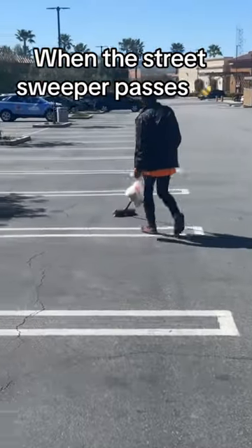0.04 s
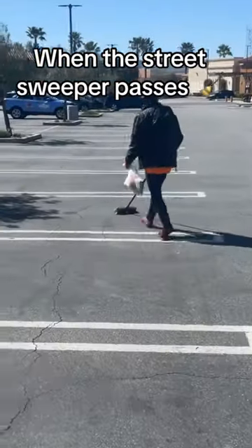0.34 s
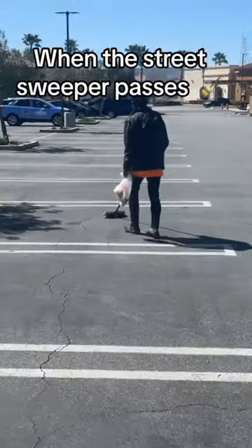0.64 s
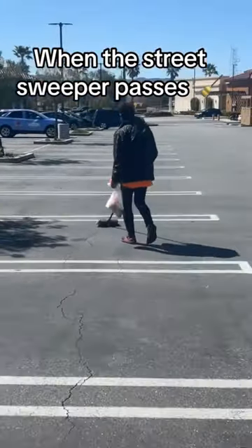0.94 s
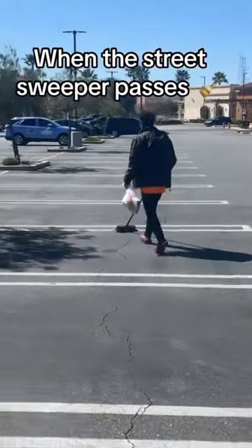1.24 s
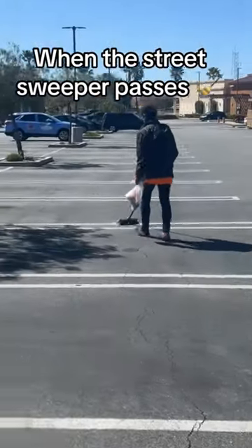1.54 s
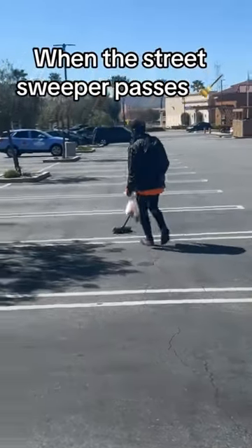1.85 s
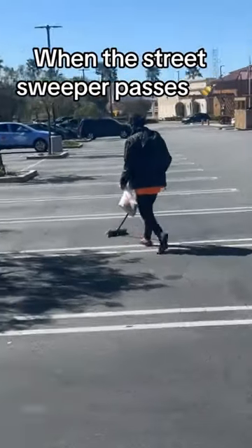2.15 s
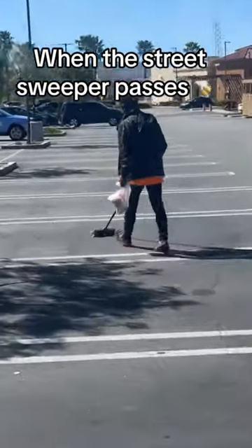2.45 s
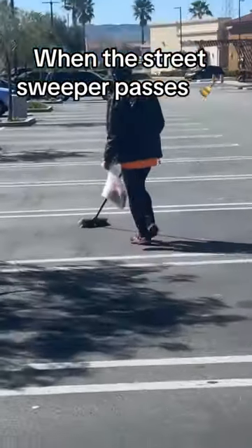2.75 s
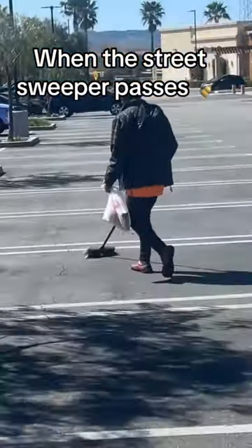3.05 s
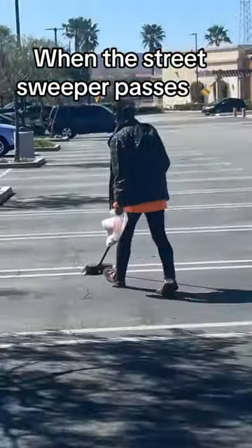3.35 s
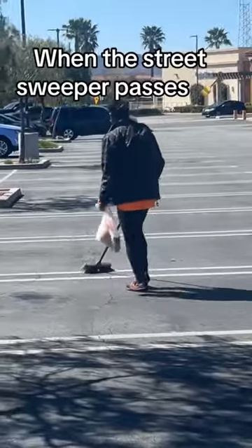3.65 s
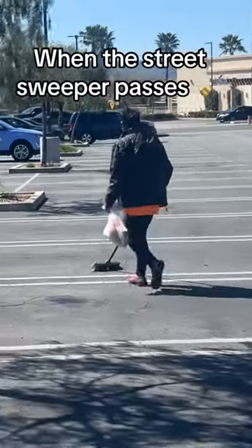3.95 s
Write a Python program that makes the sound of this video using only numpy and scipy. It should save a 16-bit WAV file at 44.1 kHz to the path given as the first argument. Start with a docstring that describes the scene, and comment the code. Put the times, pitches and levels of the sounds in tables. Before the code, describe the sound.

A stiff broom rasps over asphalt in repeated strokes, with faint footsteps between.

```python
"""A stiff broom is pushed over rough asphalt in an open car park, one stroke every two paces.
A stroke ends as the scene opens, over far traffic and a little wind on the microphone.
Shoes then tap, scuff, crack grit and roll softly over the ground. With the next push, thousands
of bristle flicks merge into a bright rasp that swells with speed and dies as the head lifts.
Steps and strokes go on alternating, with a faint return from cars and shop fronts."""
import sys
import numpy as np
from scipy import signal
from scipy.fft import rfft, irfft
from scipy.io import wavfile

SR = 44100
rng = np.random.default_rng(int(sys.argv[2]) if len(sys.argv) > 2 else 0)


def generate_wav(sig):
    """Save sig (samples, or channels by samples) to the path in sys.argv[1] as 16-bit PCM at SR."""
    pcm = np.round(np.clip(np.atleast_2d(sig).T, -1, 1) * 32767).astype(np.int16)
    wavfile.write(sys.argv[1], SR, pcm)


N = 176400
T = np.arange(N) / SR


def amp(db):
    """The decibel scale: 20 dB is a factor of ten in amplitude."""
    return 10 ** (np.asarray(db) / 20)


def unit(x):
    """Normalisation to an rms of 1."""
    return x / np.sqrt(np.mean(x ** 2) + 1e-20)


def colour(x, points):
    """Linear filtering by (Hz, dB) points, joined on a logarithmic frequency axis."""
    point_hz, db = np.transpose(points)
    hz = np.fft.rfftfreq(len(x), 1 / SR)
    gain = amp(np.interp(np.log(hz + 1), np.log(point_hz + 1), db))
    return irfft(rfft(x) * gain, len(x))


def resonate(x, hz, width_hz):
    """Forced response of one damped mode, scaled to rms 1."""
    pole = np.exp((2j * np.pi * hz - np.pi * width_hz) / SR)
    return unit(signal.lfilter([1], [1, -pole], x).real)


def clicks(per_s, spread_db):
    """Shot noise: independent impulses of uneven size and random sign."""
    size = amp(spread_db * np.minimum(rng.exponential(1, N), 5))
    return unit(size * rng.choice([-1, 1], N) * (rng.random(N) < per_s / SR))


def wobble(hz):
    """Random modulation: noise low-passed at the given frequency, at rms 1."""
    rolloff = 1 + (np.fft.rfftfreq(N, 1 / SR) / hz) ** 4
    return unit(irfft(rfft(rng.standard_normal(N)) / rolloff, N))


def burst(start, decay_s):
    """The envelope of a damped impact: sudden onset, exponential decay."""
    return (T >= start) * np.exp(-np.maximum(T - start, 0) / decay_s)


def near_echoes(x, count=14):
    """Comb filtering: reflections off ground, legs and broom head give a slightly hollow colour."""
    delays_s = rng.uniform(0.0007, 0.008, count)
    signs = rng.choice([-1, 1], count)
    echoes = sum(sign * np.roll(x, round(s * SR)) for s, sign in zip(delays_s, signs))
    return unit(x + amp(-9.5) / np.sqrt(count) * echoes)


def broom():
    """Stick-slip friction: bristles catch and flick, shaking the head and exciting the broom's modes."""
    # Each row: times of touch, full speed and lift in seconds, then level, softening at the touch,
    # head offset and tip offset, all in dB.
    strokes = [(-.3, -0.013, 0.024, -27, 20, 0.5, 4), (0.574, 0.725, .803, -26, 17.5, 0.5, 4),
               (1.296, 1.52, 1.5214, -25.5, 19, 0.5, 2.5), (2.046, 2.242, 2.297, -26.5, 17, 0.5, 0.5),
               (2.786, 3.013, 3.0353, -25, 26, 0, 4.5), (3.65, 3.82, 3.908, -24, 10.5, 1.5, 3)]
    # Spectra of the bristles on the ground, the shaken head and the tips at full speed.
    # Each row: frequency in Hz, relative spectral density in dB.
    bristle_spectrum = [(200, -26.5), (1000, -17.5), (1330, -12.5), (1530, -7), (1900, -11), (2200, -9),
                        (2650, -3.5), (4200, -1.5), (5000, -0.5), (5650, 2), (6300, 2), (6700, -1),
                        (7300, -2.5), (8400, -2.5), (9200, 1.5), (10000, -7.5)]
    head_spectrum = [(100, -10.5), (280, -2.5), (500, 0.5), (800, 1.5), (1200, 3), (1700, 3), (3000, 2),
                     (8000, -29)]
    tip_spectrum = [(2000, -17.5), (5000, -3), (7200, 14.5), (9000, 14.5), (10000, 7.5)]
    # Narrow resonances of the broom. Each row: frequency in Hz, relative level in dB.
    modes = [(2642, 0), (3437, 2.5), (4261, -1), (4567, 3), (5258, -1), (6233, 10)]
    touch_s, lift_db_per_s, lift_knee_s = 0.023, 236, 0.0094
    bristle_flicks, head_flicks, tip_flicks, mode_flicks = [
        clicks(per_s=28000, spread_db=1) for _ in range(4)]
    rings = unit(sum(amp(db) * resonate(mode_flicks, hz, width_hz=98) for hz, db in modes))
    rasp = unit(colour(bristle_flicks, bristle_spectrum)) + amp(-13.5) * rings
    head = amp(-18) * unit(colour(head_flicks, head_spectrum))
    tips = amp(-3.5) * unit(colour(tip_flicks, tip_spectrum))
    out = np.zeros(N)
    for touch, full, lift, db, soft_db, head_db, tips_db in strokes:
        push_db = -soft_db * np.clip((full - T) / (full - touch), 0, 1) ** 2.33
        push_db -= lift_db_per_s * lift_knee_s * np.logaddexp(0, (T - lift) / lift_knee_s)
        contact = amp(db) * np.clip((T - touch) / touch_s + 0.5, 0, 1)
        # The tips follow the push more steeply than the head, so the rasp brightens with speed.
        body = head * amp(0.76 * push_db + head_db)
        hiss = tips * amp(1.33 * push_db + tips_db)
        out += contact * (near_echoes(rasp) * amp(push_db) + body + hiss)
    judder_db = 0.56 * wobble(hz=70)
    return out * amp(judder_db)


def traffic():
    """Incoherent addition: far vehicles merge into a wash, with a narrow-band engine drone."""
    # The wash. Each row: frequency in Hz, relative spectral density in dB.
    spectrum = [(30, -0.5), (80, 2.5), (130, 0.5), (200, -0.5), (330, -1.5), (750, -3.5), (1400, -6.5),
                (2100, -14), (4000, -16), (6200, -17.5), (10000, -25)]
    # The drone's course. Each row: time in seconds, level in dB.
    drone_levels = [(0, -56), (1.4, -56.5), (2.1, -60.5), (3, -61), (4, -58)]
    wash, drone = rng.standard_normal((2, N))
    wash = amp(-55.5) * unit(colour(wash, spectrum)) * amp(0.34 * wobble(hz=13))
    for _ in range(2):
        drone = resonate(drone, hz=79.5, width_hz=19.2)
    return wash + amp(np.interp(T, *np.transpose(drone_levels))) * drone


def wind():
    """Turbulence: gusts make slow pressure fluctuations on the microphone."""
    # Each row: time in seconds, level in dB.
    gusts = [(0, -44.5), (1.2, -50.5), (2.1, -49.5), (2.38, -39.5), (2.78, -40.5), (2.9, -40.5),
             (3.2, -42.5), (4, -46)]
    # Each row: frequency in Hz, relative spectral density in dB.
    spectrum = [(1, -6.5), (5, -0.5), (12, -19.5), (25, -13.5), (50, -23), (100, -49), (300, -51),
                (2000, -110)]
    rumble = unit(colour(rng.standard_normal(N), spectrum))
    return amp(np.interp(T, *np.transpose(gusts))) * rumble


def rubber(hz):
    """Heavy damping gives a sole a dull, broad band of noise around one pitch."""
    # Each row: frequency as a multiple of the pitch, relative spectral density in dB.
    shape = [(.1, -10), (.5, 4.5), (1., 8.5), (1.7, -4.5), (3, -23), (10, -35.5)]
    spectrum = [(hz * multiple, db) for multiple, db in shape]
    return unit(colour(rng.standard_normal(N), spectrum))


def taps():
    """Damped impact: each landing heel or sole gives a short, dull tap."""
    # Each row: start in seconds, level in dB, pitch in Hz.
    landings = [(0.105, -46.5, 800), (.405, -49.5, 810), (0.494, -46, 425), (0.539, -53.5, 400),
                (1.122, -46, 750), (1.197, -41.5, 800), (1.312, -41.5, 454), (1.885, -44.5, 1000),
                (2.587, -48.5, 647), (2.649, -53, 900), (3.313, -46.5, 1100), (3.325, -45, 781),
                (3.343, -50, 700), (3.485, -53, 1190), (3.522, -48, 890), (3.585, -49, 1380),
                (3.598, -49, 1000)]
    return sum(amp(db) * burst(start, decay_s=0.0073) * rubber(hz) for start, db, hz in landings)


def scuffs():
    """Sliding friction: a sole catches and slides out over loose grains."""
    # Each row: start in seconds, length in seconds, level in dB, treble gain in dB.
    drags = [(0.217, 0.23, -48, -2), (0.456, 0.14, -55, 5.5), (0.939, 0.11, -47, -1),
             (1.061, 0.21, -51.5, -2), (1.792, 0.18, -52.5, -3.5), (1.892, 0.065, -52, 3.5),
             (1.947, 0.4, -53.5, 8.5), (2.426, 0.28, -52.5, -0.5), (2.616, 0.35, -56, 0),
             (3.345, 0.077, -67, -2), (3.445, 0.086, -44.5, -6.5), (3.521, 0.051, -57, -4)]
    # The dragging sole. Each row: frequency in Hz, relative spectral density in dB.
    spectrum = [(200, -3.5), (900, 2.5), (2000, 3), (2700, 3.5), (4600, 1.5), (6200, 4.5), (7000, 1),
                (10000, -0.5)]
    grains = unit(colour(clicks(per_s=7000, spread_db=2), spectrum))
    treble = colour(grains, [(2250, -30), (4500, 0)])
    out = np.zeros(N)
    for start, length, db, treble_db in drags:
        progress = np.clip((T - start) / length, 0, 1)
        envelope = np.minimum(progress / 0.13, 1) * (1 - progress) ** 0.55
        out += amp(db) * envelope * (grains + (amp(treble_db) - 1) * treble)
    return out


def grit():
    """Brittle fracture: a grain cracks under a shoe in a brief broadband burst."""
    # Each row: start in seconds, level in dB, pitch in Hz, decay time in seconds.
    cracks = [(0.242, -35, 3700, 0.0014), (0.2662, -40, 3400, .002), (.488, -38, 6050, 0.0023),
              (.988, -35, 4080, 0.0016), (1.074, -45, 4050, 0.0027), (2.4931, -38.5, 3320, 0.0023)]
    slope_db_per_octave = 8
    out = np.zeros(N)
    for start, db, hz, decay_s in cracks:
        spectrum = [(hz * 2. ** octave, -slope_db_per_octave * abs(octave)) for octave in (-4, 0, 2)]
        out += amp(db) * burst(start, decay_s) * unit(colour(rng.standard_normal(N), spectrum))
    return out


def rolls():
    """Rolling contact: a sole meets the ground gradually, so its noise swells and fades smoothly."""
    # Each row: middle in seconds, half length in seconds, level in dB, pitch in Hz.
    contacts = [(0.337, 0.047, -64.5, 1800), (.97, 0.02, -65.5, 910), (1.12, 0.042, -55, 890),
                (1.363, 0.073, -53, 880), (1.849, 0.04, -56, 2210), (1.91, 0.015, -53, 2300),
                (2.622, 0.067, -58.5, 1000), (3.35, 0.039, -58, 840), (3.49, 0.059, -62, 1110),
                (3.595, 0.022, -63, 1000)]
    return sum(amp(db) * np.exp(-((T - middle) / half) ** 2) * rubber(hz)
               for middle, half, db, hz in contacts)


def scatter(x):
    """Diffuse reflection from cars and shop fronts forms a short, decaying tail."""
    t60_s, rise_s = 0.33, 0.016
    t = T[:SR]
    tail = rng.standard_normal(SR) * amp(-60 * t / t60_s) * np.minimum(t / rise_s, 1)
    return signal.fftconvolve(x, tail / np.linalg.norm(tail))[:N]


def scene():
    """Superposition of all sources, heard from straight ahead and so alike in both ears."""
    near = broom() + scuffs() + taps() + rolls() + grit()
    mono = near + amp(-18) * scatter(near) + traffic() + wind()
    return np.array([mono, mono])


def record(dry):
    """Band limiting: the microphone's treble rolls off into a steep low-pass edge."""
    # Each row: frequency in Hz, gain in dB.
    mic_response = [(9350, 0.5), (9750, -1.5), (10000, -3.5), (10200, -33)]
    edge_hz = 10300
    heard = np.array([colour(channel, mic_response) for channel in dry])
    low_pass = signal.firwin(511, edge_hz, window=("kaiser", 9), fs=SR)
    return signal.oaconvolve(heard, low_pass[None], "same")


dry = scene()
out = record(dry)
generate_wav(out)
```